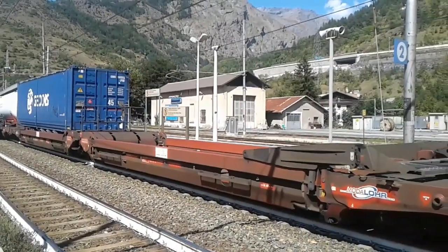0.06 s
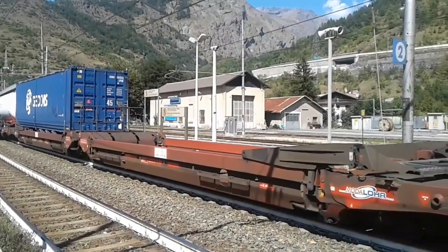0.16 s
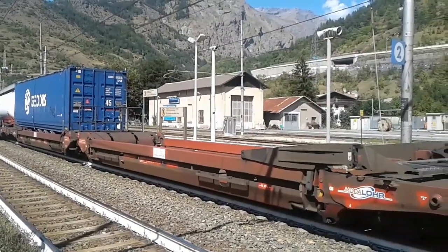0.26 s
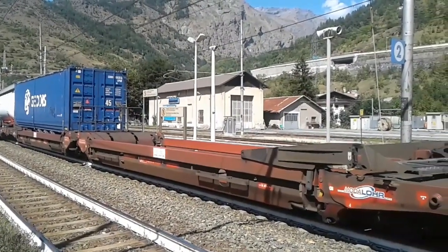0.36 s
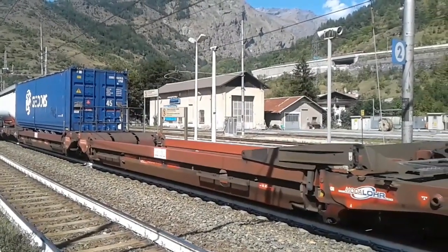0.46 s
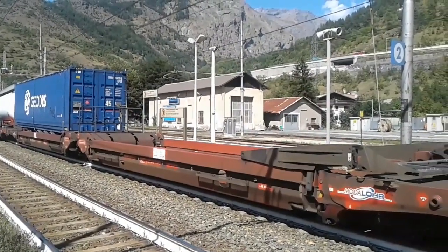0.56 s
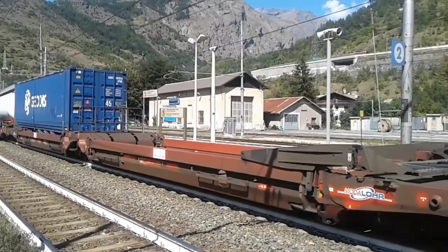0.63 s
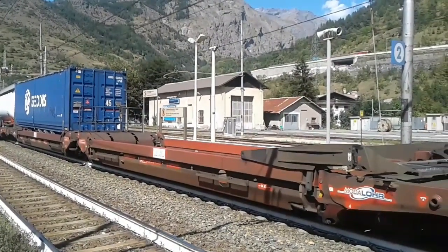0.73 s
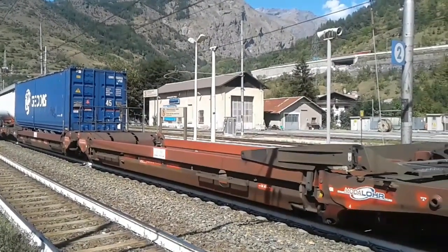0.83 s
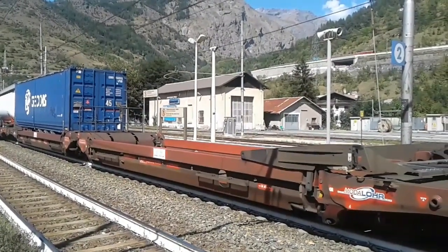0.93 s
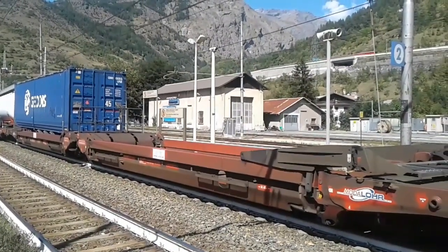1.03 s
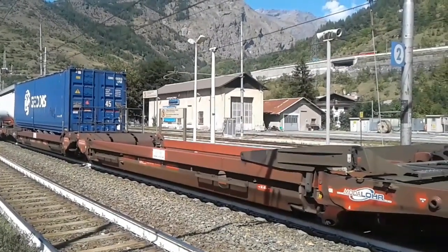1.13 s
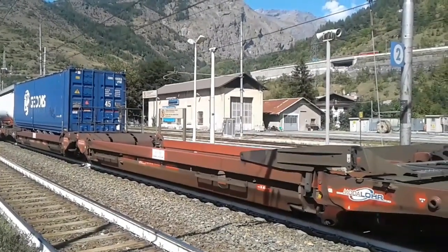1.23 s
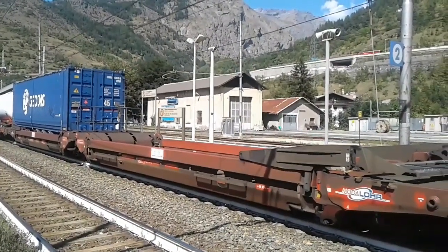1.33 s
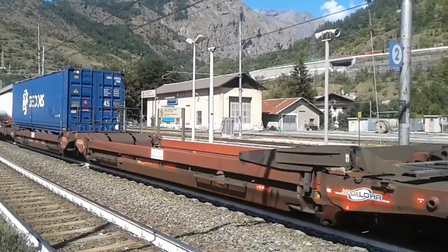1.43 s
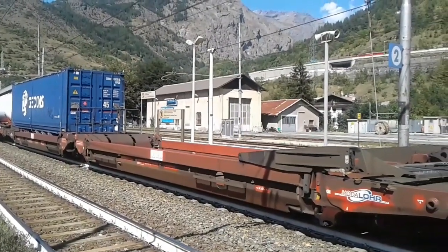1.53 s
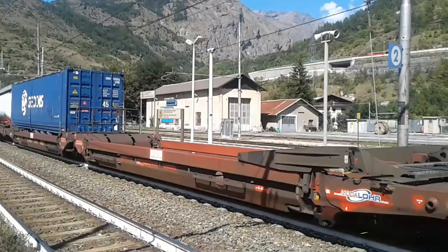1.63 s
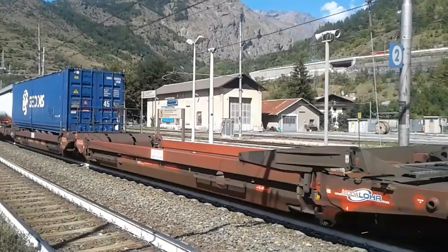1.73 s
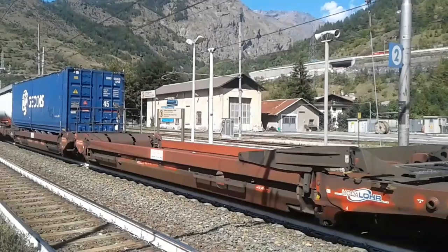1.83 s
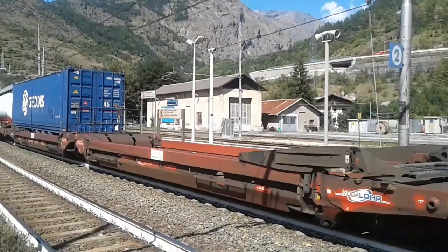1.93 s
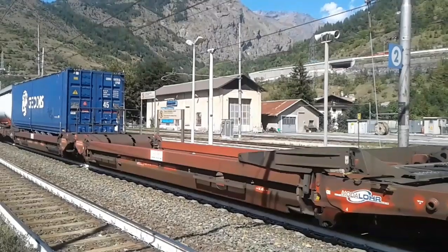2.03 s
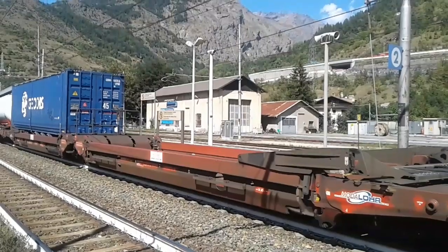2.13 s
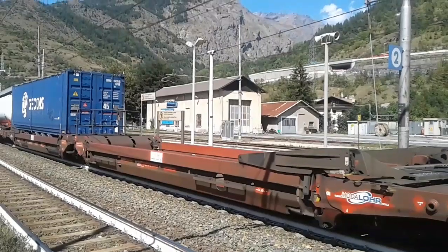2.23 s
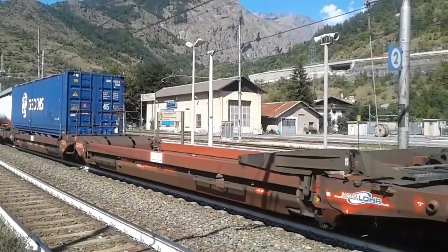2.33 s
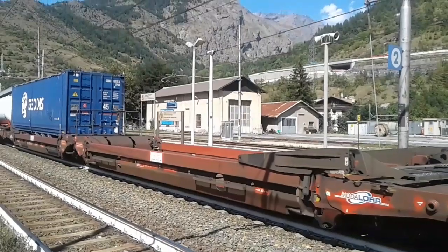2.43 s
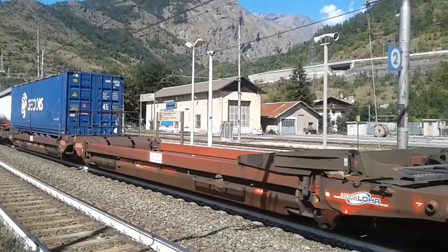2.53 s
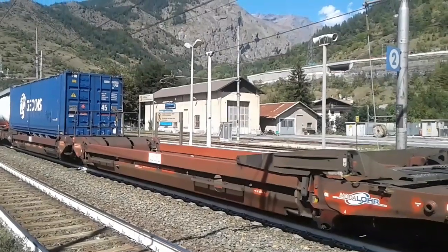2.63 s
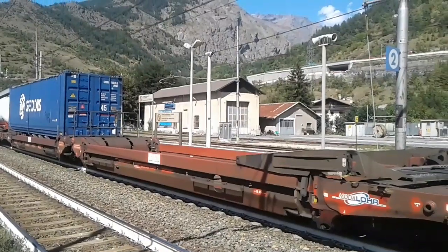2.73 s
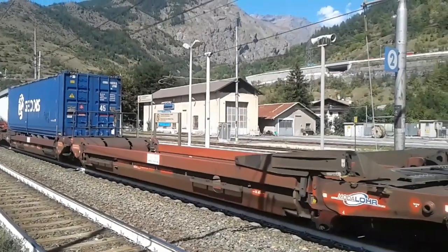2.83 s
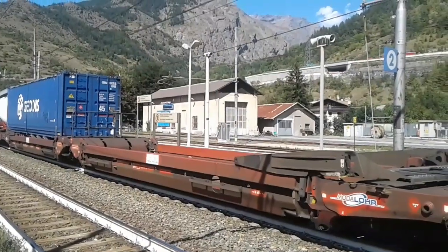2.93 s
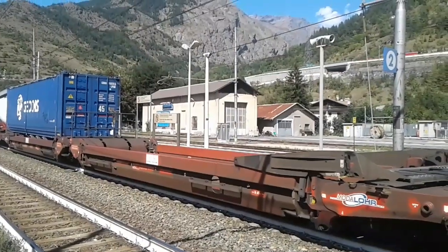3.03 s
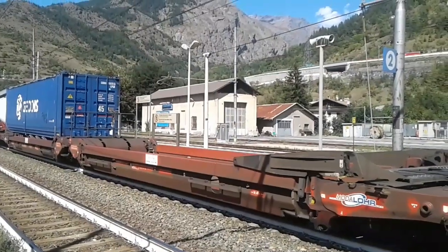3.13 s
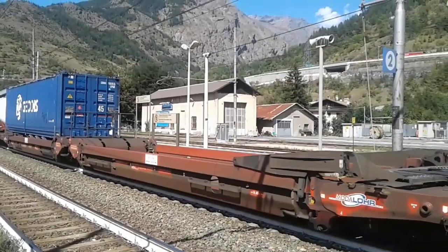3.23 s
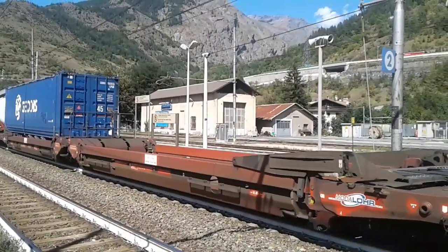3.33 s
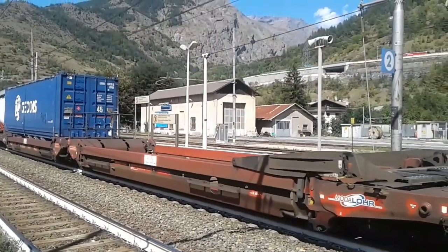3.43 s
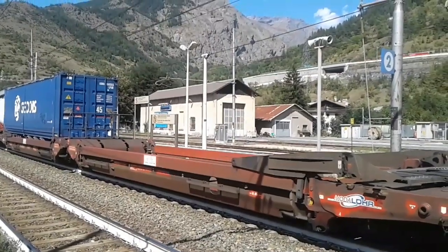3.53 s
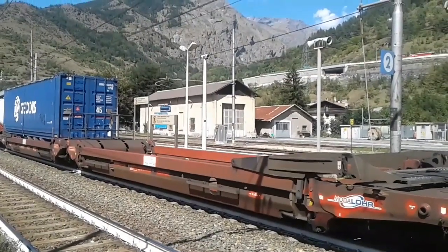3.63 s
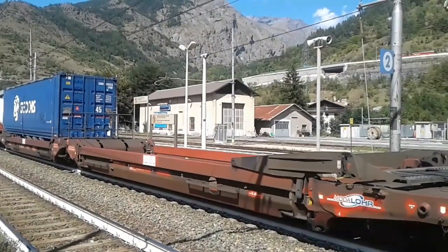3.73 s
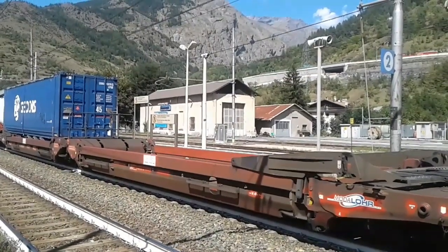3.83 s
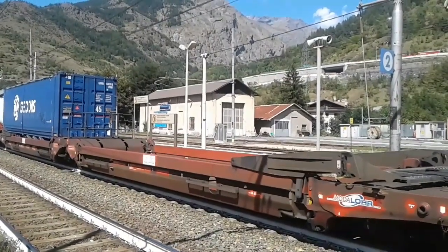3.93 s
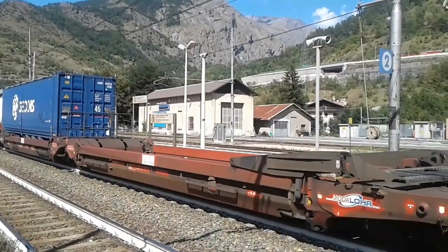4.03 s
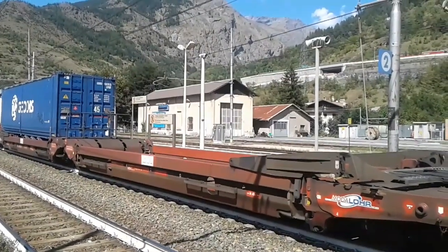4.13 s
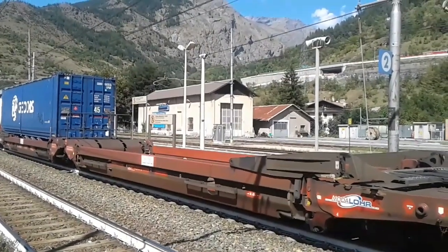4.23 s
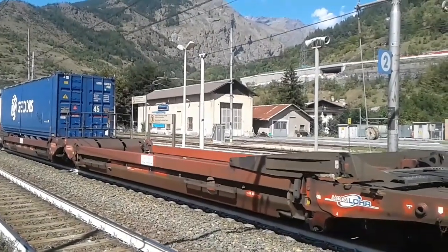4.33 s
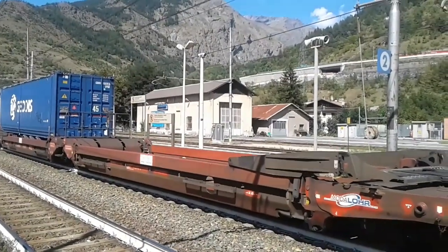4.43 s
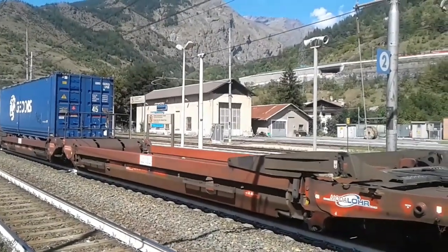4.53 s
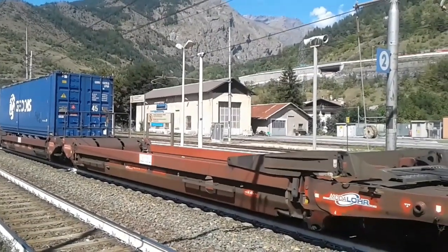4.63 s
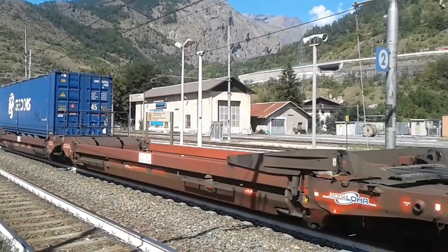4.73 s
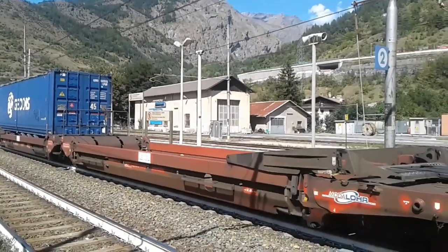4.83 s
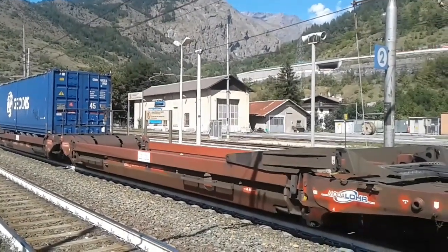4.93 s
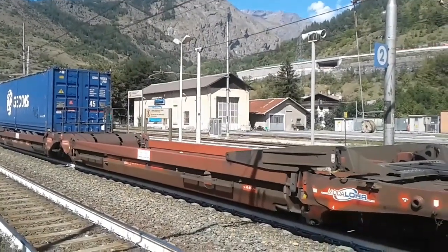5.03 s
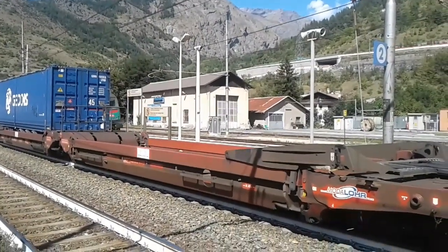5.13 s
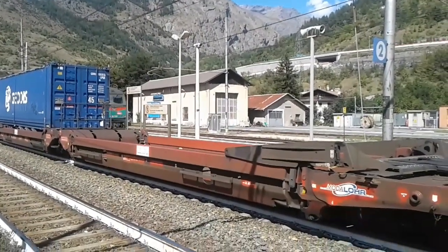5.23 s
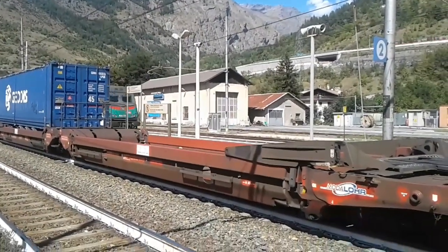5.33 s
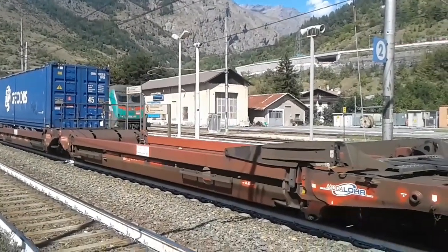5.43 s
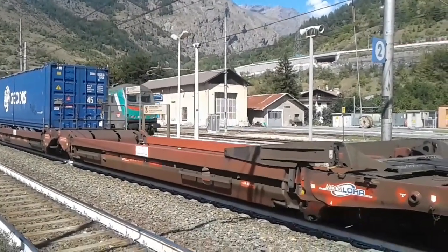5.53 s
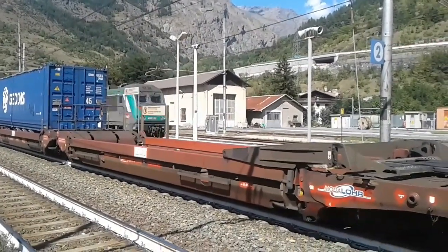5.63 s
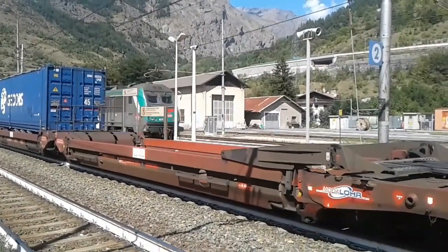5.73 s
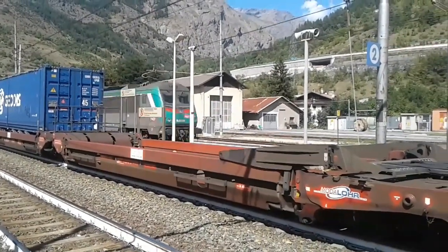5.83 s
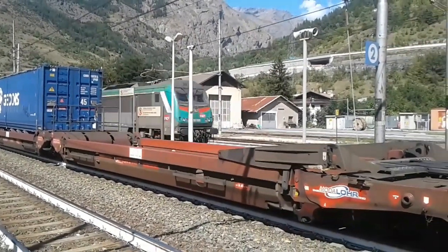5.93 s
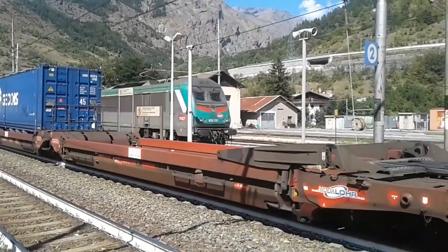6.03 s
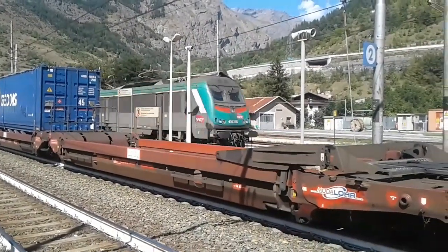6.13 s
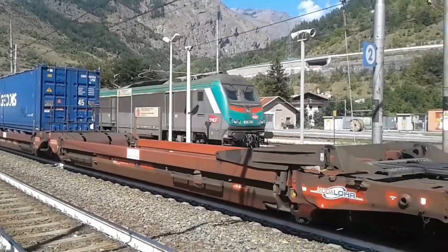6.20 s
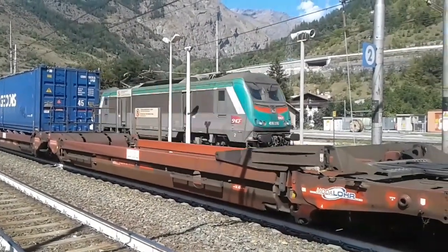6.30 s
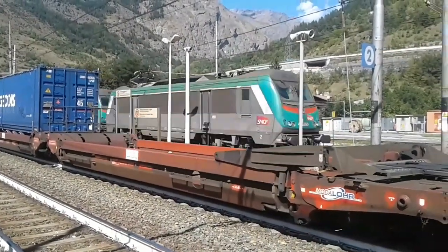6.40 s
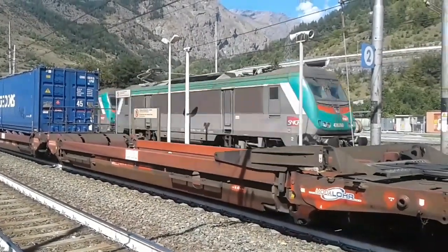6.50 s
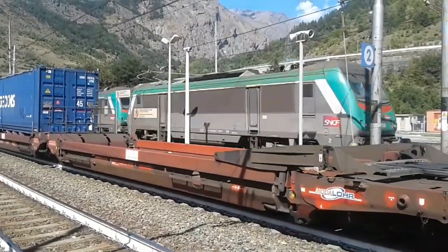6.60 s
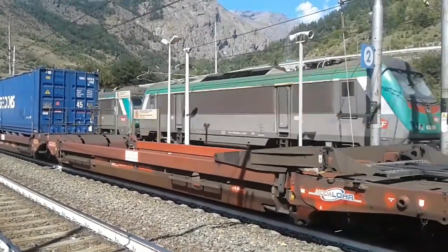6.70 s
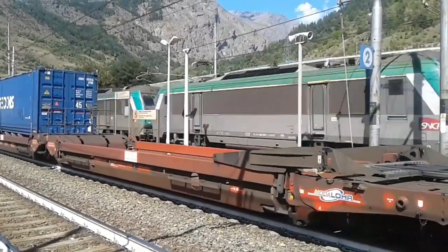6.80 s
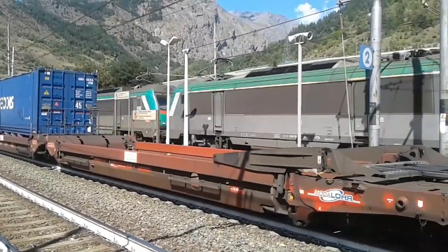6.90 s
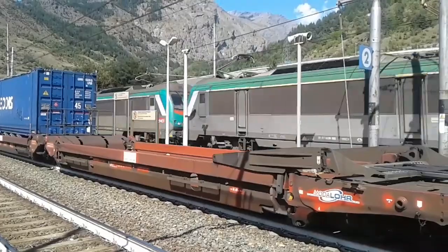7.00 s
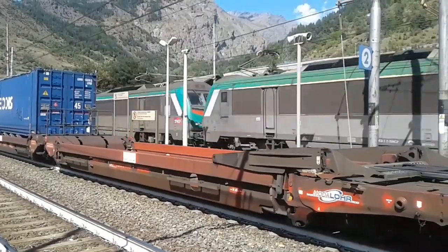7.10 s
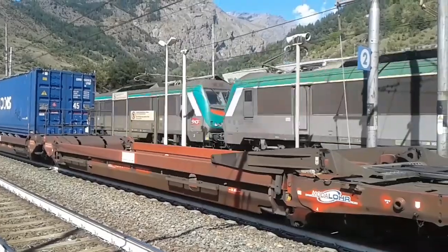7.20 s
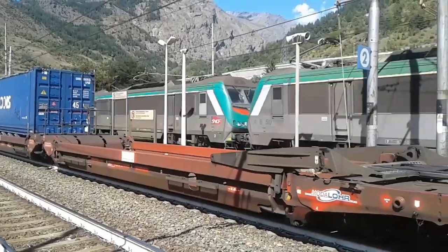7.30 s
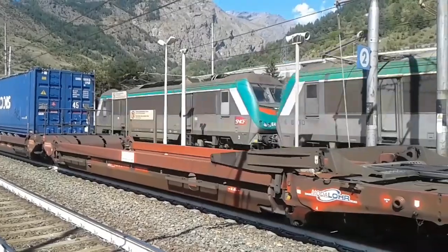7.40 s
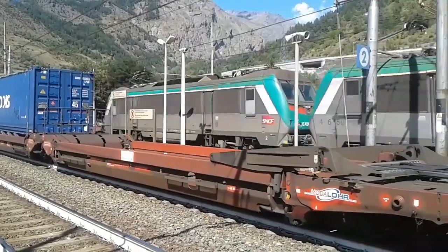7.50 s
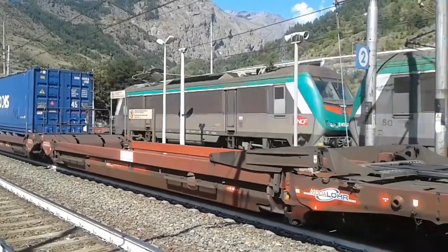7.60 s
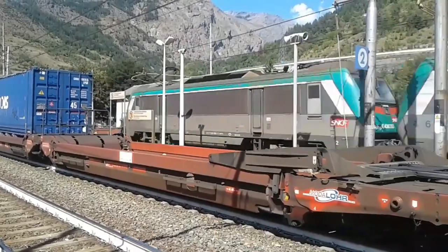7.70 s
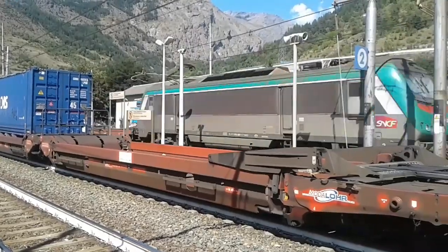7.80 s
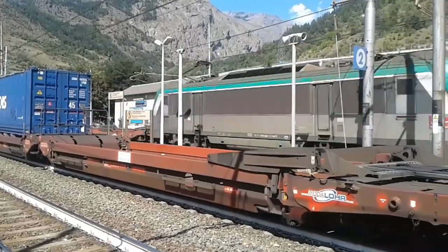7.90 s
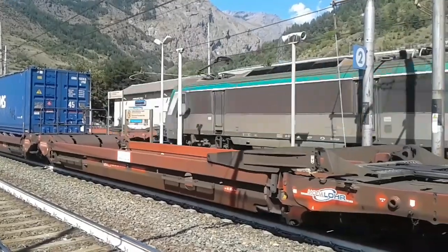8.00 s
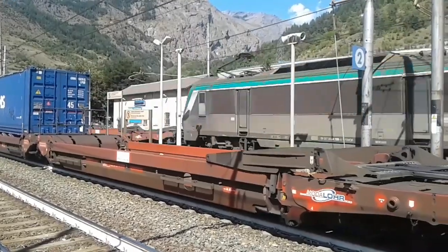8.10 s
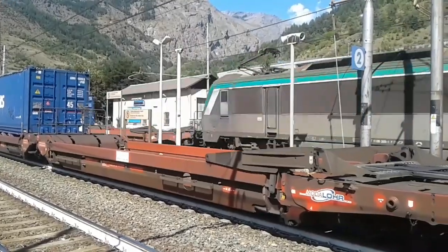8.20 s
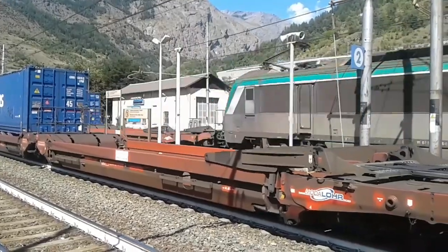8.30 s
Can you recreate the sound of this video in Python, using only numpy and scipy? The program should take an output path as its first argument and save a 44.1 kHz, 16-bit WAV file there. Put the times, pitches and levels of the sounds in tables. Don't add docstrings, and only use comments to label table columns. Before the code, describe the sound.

A breezy open station platform heard through a small, muffled microphone with faint hiss. From 0 to 5 seconds it is quiet: soft lumpy wind bumps, near 1 and 3.7 seconds especially, faint steady electrical hums, tiny camera ticks with pauses, and barely audible high lens-motor tones around 1.4-2.3 and 4 seconds. Far away, a train's wheels rumble and its cooling blowers whine around 500 hertz, swimming in and out. The sound creeps up, then rises fast from 5.5 seconds, with short, faint, fuzzy flange whistles until about 6.7 and low groaning. From 6.5 seconds two coupled locomotives pass with a broad, rough, brighter rail roar, strongest near 7.4, and gusty air thumps. A deep groan peaks around 7.1-7.7 as layered blower tones slide downward. The roar continues until the abrupt end at about 8.4.

```python
import sys
import numpy as np
from scipy import signal
from scipy.fft import rfft, irfft, next_fast_len
from scipy.io import wavfile
from scipy.ndimage import uniform_filter1d

SR = 44100
rng = np.random.default_rng(int(sys.argv[2]) if len(sys.argv) > 2 else 0)


def undo_db(level):
    steps = np.asarray(level, float) / 20
    return 10 ** steps


def transcribe(u):
    v = np.clip(np.atleast_2d(u).T, -1, 1)
    q = np.round(v * 32767).astype(np.int16)
    wavfile.write(sys.argv[1], SR, q)


N = 368235
TIME = np.arange(N) / SR

# (time [s], roar level [dB])
TRAIN = [(0, -50), (0.8, -49), (1.6, -46.5), (2.4, -44.5), (2.9, -41.5), (3.6, -41.5), (4.0, -40.5),
         (4.8, -38.5), (5.6, -34.5), (6.0, -31), (6.4, -27), (6.6, -23), (7.0, -22.5), (7.4, -19),
         (7.6, -21), (8.35, -21)]
# (frequency [Hz], gain [dB])
MICROPHONE = [(20, -31), (40, -7.5), (80, 6.5), (120, 2.5), (3500, 1), (4100, -5.5), (5100, -24),
              (6300, -32), (8000, -33.5), (11000, -47), (16000, -66)]
SPEED_M_S, TRACK_M, SOUND_M_S = 15.4, 11, 343


def evened(x):
    return x / np.sqrt(np.mean(x ** 2) + 1e-20)


def read(points, hz):
    f, value = np.transpose(points)
    return np.interp(np.log(hz + 1), np.log(f + 1), value)


def roar_db(t):
    times, levels = np.transpose(TRAIN)
    return np.interp(t, times, levels)


def bump(t, s, half):
    return np.cos(np.pi / 2 * np.clip((t - s) / half, -1, 1)) ** 2


def swells(rows):
    coarse = TIME[::64]
    total = sum(undo_db(db) * bump(coarse, s, half) for s, half, db in rows)
    return np.interp(TIME, coarse, total)


def window(start, end, edge):
    return np.clip(np.minimum(TIME - start, end - TIME) / edge + .5, 0, 1)


def wander(rate_hz, size):
    steps = rng.standard_normal((size // 64 + 400, 2)) @ [1, 1j]
    r = np.exp(-np.pi * rate_hz * 64 / SR)
    slow = signal.lfilter([1], [1, -r], steps)
    slow = signal.lfilter([1], [1, -r], slow)
    slow = slow[::-1] / np.sqrt(np.mean(abs(slow) ** 2))
    return np.interp(np.arange(size) / 64, np.arange(len(slow)), slow)


def whine(hz, blur_hz, rough):
    rough = np.clip(rough, 0, 1)
    carrier = np.exp(2j * np.pi * (np.cumsum(hz) / SR + rng.random()))
    unsteady = np.sqrt(1 - rough) + np.sqrt(rough) * wander(blur_hz, len(hz))
    return np.sqrt(2) * (carrier * unsteady).real


def steady(rows, edge, rough, blur_hz=5.5, fade_db=0):
    out = np.zeros(N)
    for start, end, hz, db in rows:
        on = (TIME > start - edge) & (TIME < end + edge)
        level_db = db - fade_db * (TIME[on] - start) / (end - start)
        tone = whine(np.full(on.sum(), hz), blur_hz, rough)
        out[on] += undo_db(level_db) * window(start, end, edge)[on] * tone
    return out


def noise(field_db, patchy_db):
    frames, hz = N // 256 + 5, np.fft.rfftfreq(1024, 1 / SR)
    a, b, patches = rng.standard_normal((frames, 513, 3)).T
    patches = uniform_filter1d(patches, size=8, axis=0)
    patches = evened(uniform_filter1d(patches, size=16, axis=1))
    level_db = field_db(hz[:, None], np.arange(frames) * 256 / SR) + patchy_db * patches
    return signal.istft((a + 1j * b) * undo_db(level_db), nperseg=1024, noverlap=768)[1][:N]


def hiss():
    # (frequency [Hz], level per Hz [dB])
    colour = [(3000, -3.5), (5500, 2), (7000, -1), (8500, -3), (10000, -6.5), (11500, -8.5), (13000, -2),
              (15000, -0.5), (16000, -1.5)]
    return undo_db(-72.5) * evened(noise(lambda hz, t: read(colour, hz) + 0 * t, patchy_db=.8))


def lens_motor():
    # (start [s], end [s], pitch [Hz], level [dB])
    moves = [
        (1.42, 2.32, 13168, -88),
        (1.42, 2.32, 6083, -89),
        (3.93, 4.28, 15353, -85),
        (3.93, 4.28, 7671, -87),
        (3.3, 4.8, 14002, -99),
    ]
    return steady(moves, edge=.01, rough=.03)


def ticks():
    round_s, first_s = .64008, -.0782
    # (time into the round [s], peak level [dB])
    pattern = [
        (0, -68.5),
        (.0998, -67.5),
        (.32, -68),
    ]
    # (start [s], end [s])
    pauses = [
        (1.1, 1.8),
        (3.5, 4.3),
        (7, 7.5),
        (7.65, 7.8),
        (8, 9),
    ]
    # (time [s], peak level [dB])
    stumbles = [
        (.9772, -67),
        (1.1972, -75),
        (6.2612, -74),
    ]
    click = np.sin(2 * np.pi * 9650 * np.arange(80) / SR) * np.hanning(80)
    steps = [(s + into, db) for s in np.arange(first_s, N / SR, round_s) for into, db in pattern]
    steps = [(s, db) for s, db in steps if s > 0 and not any(a < s < b for a, b in pauses)]
    out = np.zeros(N)
    for s, db in steps + list(stumbles):
        for lag_s, change_db in ((0, 1), (.008, -2)):
            out[round((s + lag_s) * SR):][:80] += undo_db(db + change_db) * click
    return out


def hums():
    # (start [s], end [s], pitch [Hz], level [dB])
    tones = [
        (-.3, 4.3, 1820, -61),
        (.6, 1.3, 1024, -61),
        (0, .3, 1252, -61),
        (1.15, 1.6, 1264, -65),
    ]
    return steady(tones, edge=0.2, rough=0.05, blur_hz=3.6)


def breeze():
    # (time [s], half length [s], level [dB])
    gusts = [(.22, 0.055, -37), (.47, 0.22, -47.5), (0.719, 0.045, -37), (0.954, 0.062, -32.5),
             (1.12, .08, -39.5), (1.27, 0.15, -37.5), (1.704, .08, -44), (3.1, 0.032, -46),
             (3.34, 0.18, -39.5), (3.549, 0.11, -40), (3.746, 0.16, -35), (3.995, 0.22, -43.5),
             (4.301, 0.24, -44), (4.658, .08, -43.5), (4.985, .12, -43), (5.253, 0.062, -45.5),
             (5.397, 0.059, -48.5), (6.097, .15, -34), (6.302, 0.045, -33), (6.438, 0.064, -31),
             (6.6, .09, -30), (6.78, 0.052, -27), (6.875, .06, -27.5), (7.048, .05, -27),
             (7.18, 0.061, -30.5), (7.498, .1, -34), (7.626, 0.045, -26), (7.78, .09, -26.5),
             (8.133, .07, -28.5), (8.287, .1, -38)]
    # (frequency [Hz], level per Hz [dB])
    buffet = [(20, -18.5), (45, 4.5), (90, -1.5), (140, -1), (220, -12), (400, -40.5)]
    eddies = evened(noise(lambda hz, t: read(buffet, hz) + 0 * t, patchy_db=4.0))
    eddies = eddies / (uniform_filter1d(eddies ** 2, size=1500) + .05) ** 0.46
    calm = undo_db(-49 + .45 * (roar_db(TIME) - TRAIN[0][1]))
    return undo_db(-8) * (calm + swells(gusts)) * evened(eddies)


def flanges():
    # (time [s], length [s], pitch [Hz], level after the microphone [dB])
    grazes = [
        (5.52, .17, 6750, -84),
        (5.52, .15, 7700, -87),
        (5.943, 0.047, 7650, -75),
        (6.041, .22, 7800, -80),
        (6.06, 0.25, 6800, -79),
        (6.376, 0.048, 6640, -76),
        (6.37, .35, 7660, -76),
        (6.4, .25, 6800, -79),
    ]
    rows = [(s, s + length, hz + apart_hz, db - read(MICROPHONE, hz))
            for s, length, hz, db in grazes for apart_hz in (-200, 200)]
    return steady(rows, edge=.02, rough=0.97, blur_hz=450, fade_db=6)


def groans():
    # (start [s], end [s], pitch [Hz], level [dB])
    tones = [
        (5.5, 6.45, 392, -45),
        (5.85, 6.55, 375.4, -40.5),
        (7.1, 7.7, 302.4, -26.5),
        (7.3, 8, 270, -32),
    ]
    return steady(tones, edge=0.22, rough=0.94, blur_hz=39.4)


def roar():
    # (frequency [Hz], level per Hz [dB])
    far = [(60, -1), (160, 9), (250, 5), (400, 3.5), (630, 6), (800, 3), (1150, -0.5), (1350, 0.5),
           (1680, -6), (1950, 1.5), (2300, -3.5), (3200, -7), (5000, -9), (9000, -21)]
    # (frequency [Hz], level per Hz [dB])
    close = [(60, -11), (100, -1.5), (170, 7.5), (290, 5.5), (400, 2.5), (630, 6.5), (800, 2), (1150, 0),
             (1650, -4.5), (2000, -1.5), (3200, -7), (5000, -8), (7500, -15), (9500, -23.5)]
    # (time [s], half length [s], rail hiss [dB], body boom [dB], wheel sizzle [dB])
    crossings = [(0.402, 0.44, -2, 2, 2), (1.2, 0.23, 0.5, 4, 0), (2.005, 0.29, 0, 9, -1),
                 (3.0, 0.95, 2.5, 0.5, -7), (3.6, 0.36, -1, -0.5, 1), (4.6, 0.58, -2, -0.5, 3.5),
                 (5.197, .2, -1, 1.5, 1.5), (5.61, 0.23, -1, -0.5, 2.5), (6.0, 0.27, 0.5, -1, 0.5),
                 (6.393, .25, 2.5, -3.5, -1.5), (6.655, 0.22, -1, -2.5, -2), (7.007, 0.27, 1.5, 3, 0),
                 (7.4, .25, -1, 1.5, 0.5), (7.602, .2, 0, 9, 0.5), (8.05, 0.39, -0.5, 4.5, -0.5)]
    far_db, near_db = -41, -25

    def field(hz, t):
        def stirred(column):
            return sum(row[column] * bump(t, row[0], row[1]) for row in crossings)

        level = roar_db(t)
        near = np.clip((level - far_db) / (near_db - far_db), 0, 1)
        haze = -3.5 * np.clip((-45.5 - level) / 3, 0, 1)
        hiss_db = haze + stirred(2) - .3
        boom_db = stirred(3) - 1.2
        sizzle_db = -3 + 3 * near ** 2 + stirred(4)
        colour = (1 - near) * read(far, hz) + near * read(close, hz)
        colour = colour + hiss_db * read([(900, 0), (2300, 0.92)], hz)
        colour = colour + boom_db * read([(190, 0.064), (240, 1), (330, 0.091), (420, 0)], hz)
        colour = colour + 4.2 * sizzle_db * read([(4800, 0.052), (6500, 0.74)], hz)
        return level - 16 + colour

    return noise(field, patchy_db=0.57)


def passing(level_s, hz):
    past = (TIME - level_s) * SPEED_M_S / TRACK_M
    approach = past / np.sqrt(1 + past ** 2)
    return hz * (1 - SPEED_M_S / SOUND_M_S * approach), past / (1 + past ** 2)


def paths(views, echoes, clarity):
    tracks = []
    for level_s, hz, start, end in views:
        tracks.append((start, end, *passing(level_s, hz)))
    for start, end, hz, sag in echoes:
        tracks.append((start, end, hz - sag * (TIME - start), 0 * TIME))
    for (start, end, hz, turning), (tone_db, over_db, bearing) in zip(tracks, clarity):
        gate = window(start, end, .25)
        on = gate > 0
        yield on, hz[on], undo_db(tone_db) * gate[on], undo_db(over_db) * gate[on], bearing + turning[on]


def roof_fans():
    # (draws level [s], blade pitch [Hz], start [s], end [s])
    views = [
        (7.43, 507, 5.05, 5.9),
        (7.43, 507, 5.9, 6.85),
        (7.43, 507, 6.85, 7.9),
        (8.5, 507, 6.9, 7.9),
        (8.5, 507, 7.9, 9),
    ]
    # (start [s], end [s], pitch [Hz], sag [Hz per s])
    echoes = [
        (-.2, 1.1, 528, 1),
        (.1, .6, 515, 0),
        (1.5, 3.6, 527, 1),
        (1, 3, 515, 0),
        (3.6, 5.05, 528, 0),
        (4.8, 5.4, 504, 0),
        (6.3, 6.9, 505, 5),
    ]
    # (blade tone [dB], overtone [dB], bearing [-0.5 ahead to 0.5 behind])
    clarity = [(-2.5, -3, 0), (-1, 1.5, 0), (3.5, 6, 0), (-6.5, 4, 0), (4.5, 1.5, 0), (-15, -5, 0),
               (-9, 6, 0), (-5, 2.5, 0), (-8, 7, 0), (-8, -4, 0), (-5, -5, 0), (1, -7, 0)]
    chord, upper = np.zeros(N), np.zeros(N)
    for on, hz, tone, over, _ in paths(views, echoes, clarity):
        chord[on] += tone * whine(hz, blur_hz=7, rough=.25)
        upper[on] += over * undo_db(-18.5) * whine(2 * hz, blur_hz=7.3, rough=0.78)
    return chord, upper


def motor_blowers():
    # (draws level [s], blade pitch [Hz], start [s], end [s])
    views = [
        (7, 475, 5.45, 5.9),
        (7, 475, 5.9, 6.4),
        (7, 475, 6.4, 7.1),
        (7, 475, 7.1, 7.7),
        (7, 475, 7.7, 9),
        (7.7, 461, 5.6, 7),
        (7.7, 461, 7, 7.75),
        (7.7, 461, 7.75, 9),
    ]
    # (start [s], end [s], pitch [Hz], sag [Hz per s])
    echoes = [
        (-.2, .6, 468, 2),
        (.6, 1.7, 512, 4),
        (1.8, 3.9, 493, 2.5),
        (1.7, 4.5, 507, 3.2),
        (3.9, 5.3, 488, .5),
        (4.55, 5.6, 498, 14),
    ]
    # (blade tone [dB], overtones [dB], bearing [-0.5 ahead to 0.5 behind])
    clarity = [(0.5, 0, -0.19), (-2.5, -6, -0.33), (-6.5, -8.5, -.1), (-2, -1.5, -0.35), (-1.5, -3.5, .1),
               (-9.5, -6, 0), (-6.5, -12, 0), (-6.5, -5.5, -0.036), (-12, -18, 0), (-10, -11, -.4),
               (-1.5, -2.5, 0.25), (-3, -25, 0), (-13, -5.5, -0.39), (-7, -1.5, -.3)]
    # (multiple of the blade pitch, level [dB])
    overtones = [(2, -7), (3, -3.5), (4, -4), (5, -15)]
    louvre_db = {3: 3.75, 4: -3.75}
    chord, upper = np.zeros(N), np.zeros(N)
    for on, hz, tone, over, bearing in paths(views, echoes, clarity):
        chord[on] += tone * whine(hz, blur_hz=11, rough=.5)
        for k, db in overtones:
            gain = over * undo_db(db - 1.5 + bearing * louvre_db.get(k, 0))
            upper[on] += gain * whine(k * hz, blur_hz=6 * k, rough=0.55)
    lead_hz, _ = passing(views[0][0], views[0][1])
    for k, db in overtones[:3]:
        upper += undo_db(db - 6) * whine(k * lead_hz, blur_hz=45 * k, rough=1.0)
    return chord, upper


def fans():
    # (time [s], half length [s], level over the roar [dB])
    swims = [(0.39, 0.2, -0.5), (.85, 0.12, -21), (1.243, .3, -8), (1.786, 0.24, 0.5), (2.268, 0.16, 1),
             (2.45, 0.055, 4), (2.71, 0.13, -3), (2.92, .1, -10), (3.397, 0.35, -9), (3.796, .28, -9),
             (4.224, 0.063, -2), (4.624, 0.16, -16), (4.83, 0.055, -9), (5.022, 0.055, 0),
             (5.15, 0.081, -2.5), (5.5, 0.45, -7.5), (5.718, 0.028, 5), (5.882, 0.12, 0.5),
             (6.099, 0.18, 4), (6.371, 0.1, 5.5), (6.581, 0.14, 2.5), (6.74, 0.034, -1), (6.847, 0.033, 5),
             (6.98, 0.12, 1.5), (7.106, .07, 2.5), (7.337, 0.26, -5), (7.691, 0.29, 3.5), (8.141, 0.25, -1),
             (8.35, 0.058, 2)]
    motor_chord, motor_upper = motor_blowers()
    roof_chord, roof_upper = roof_fans()
    chord, upper = motor_chord + roof_chord, motor_upper + roof_upper
    chord /= np.sqrt(uniform_filter1d(chord ** 2, size=4000) + 0.033)
    swim = undo_db(-2.5) + swells(swims)
    return undo_db(roar_db(TIME)) * (undo_db(-4.5) * swim * chord + undo_db(-6.5) * swim ** 0.29 * upper)


def scene():
    return (hums() + breeze() + flanges() + groans() + roar() + fans())[None]


def band_limit(x):
    return signal.sosfilt(signal.butter(12, 15719, fs=SR, output="sos"), x)


def record(dry):
    size = next_fast_len(N + 4096)
    dry = 1.1 * np.tanh(dry / 1.1) * window(-1, N / SR - .004, .008)
    response = undo_db(read(MICROPHONE, np.fft.rfftfreq(size, 1 / SR)))
    heard = irfft(rfft(dry, size) * response, size)[:, :N]
    camera = hiss() + ticks() + lens_motor()
    return band_limit(heard + camera)


dry = scene()
out = record(dry)
transcribe(out)
```